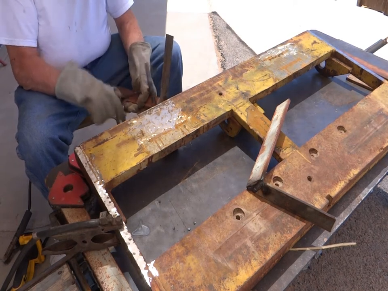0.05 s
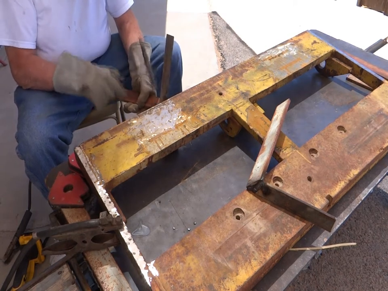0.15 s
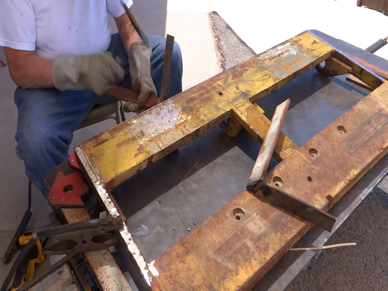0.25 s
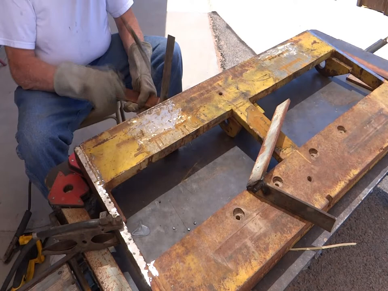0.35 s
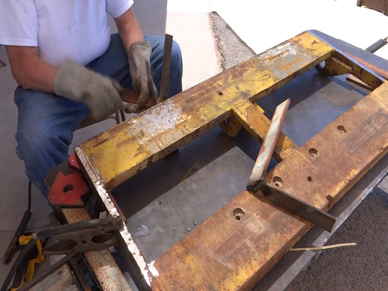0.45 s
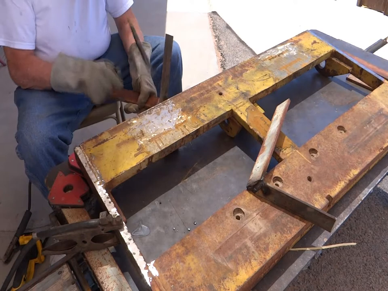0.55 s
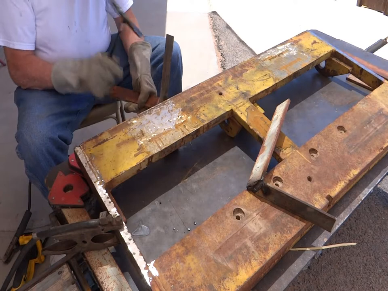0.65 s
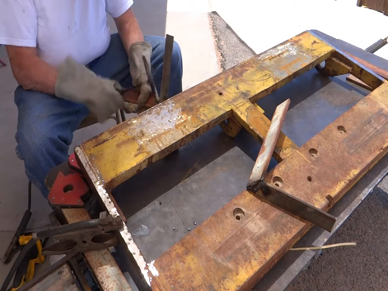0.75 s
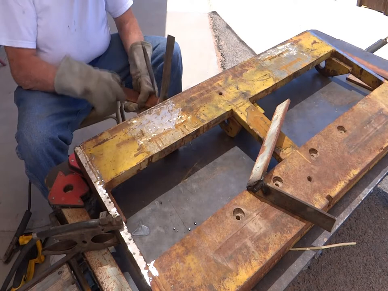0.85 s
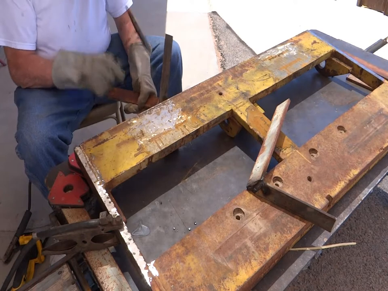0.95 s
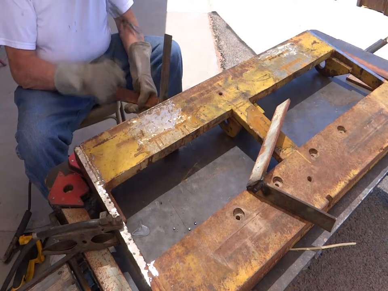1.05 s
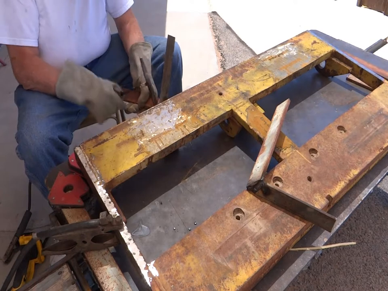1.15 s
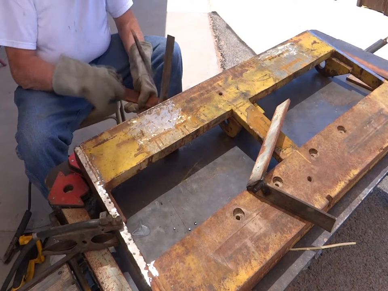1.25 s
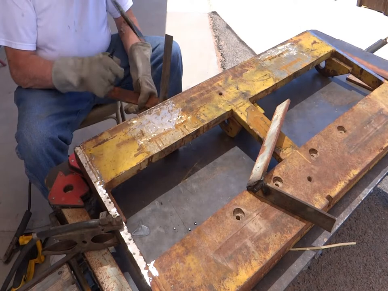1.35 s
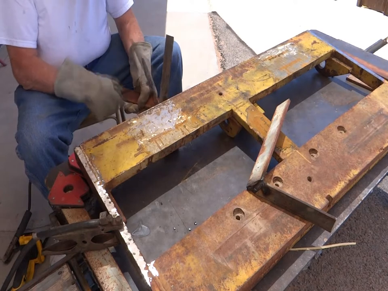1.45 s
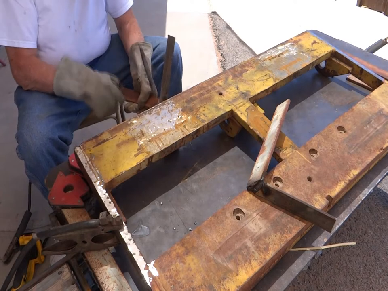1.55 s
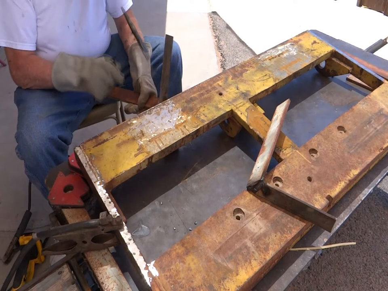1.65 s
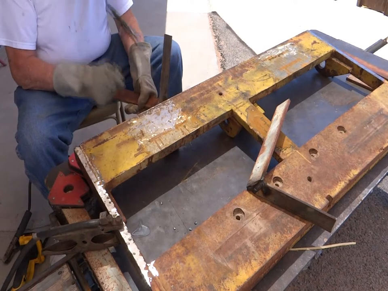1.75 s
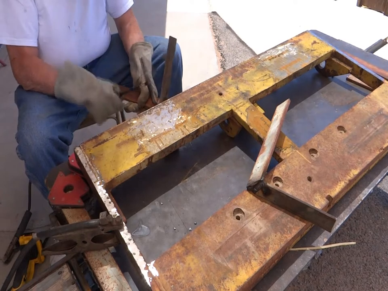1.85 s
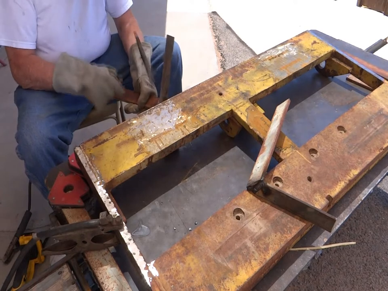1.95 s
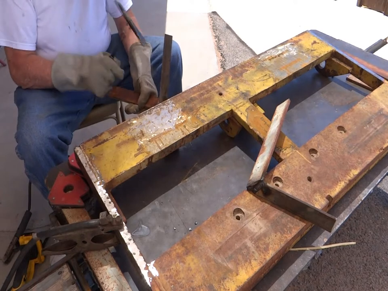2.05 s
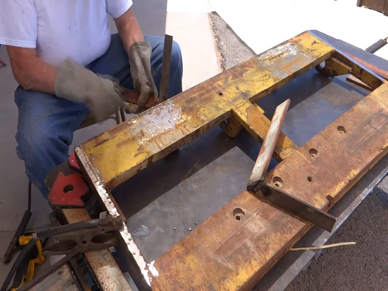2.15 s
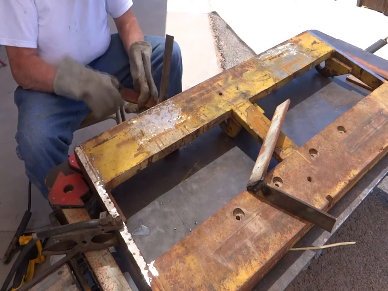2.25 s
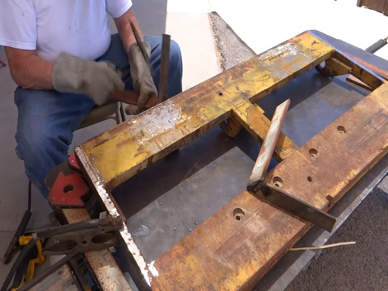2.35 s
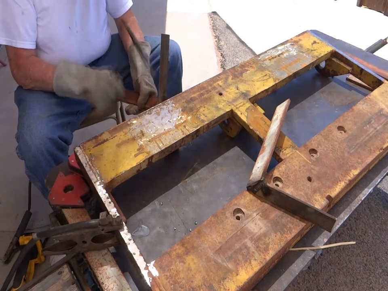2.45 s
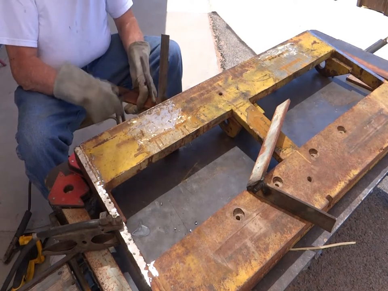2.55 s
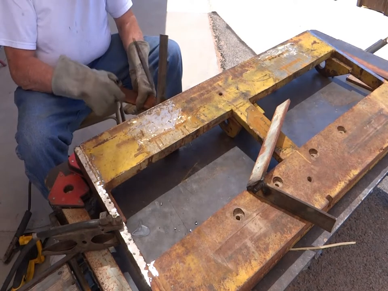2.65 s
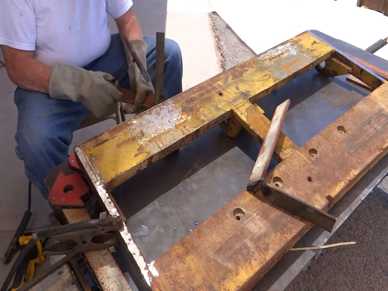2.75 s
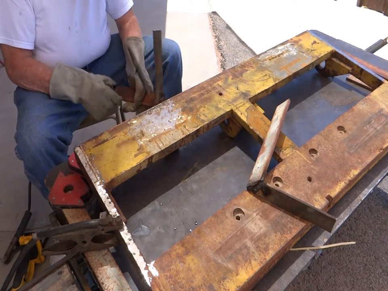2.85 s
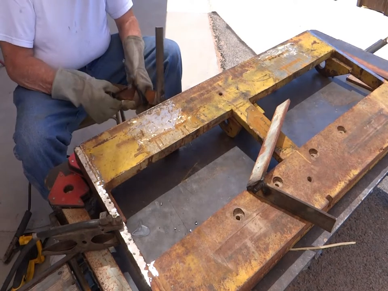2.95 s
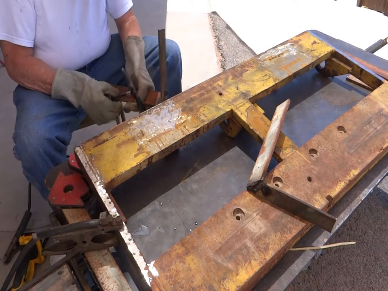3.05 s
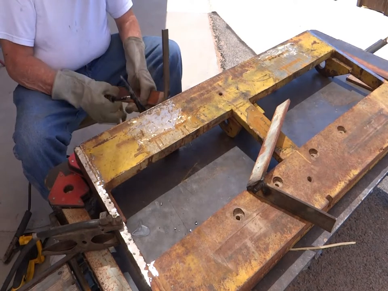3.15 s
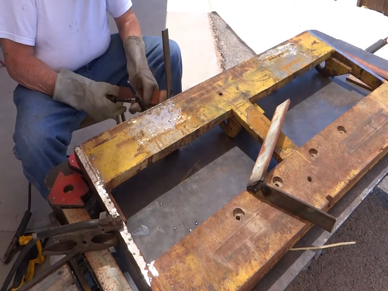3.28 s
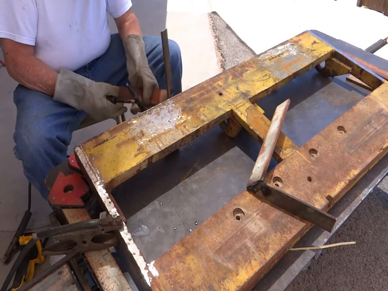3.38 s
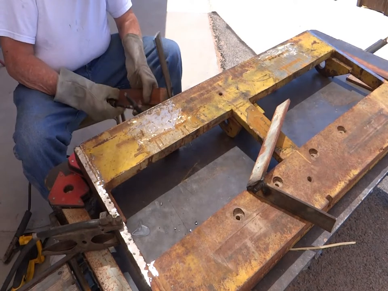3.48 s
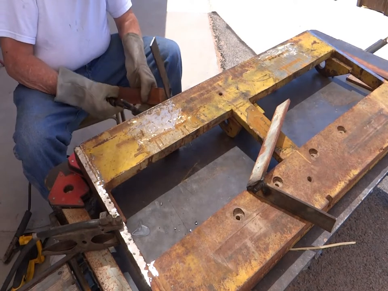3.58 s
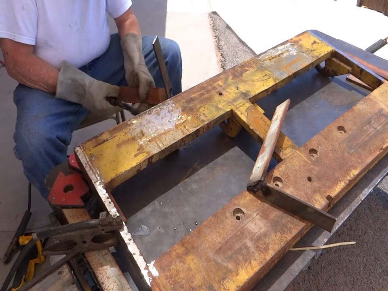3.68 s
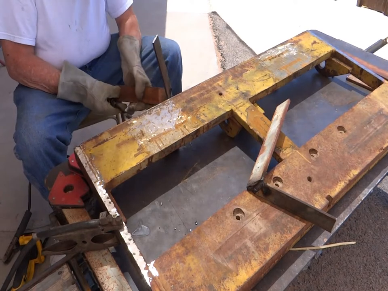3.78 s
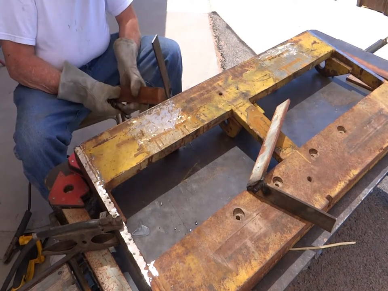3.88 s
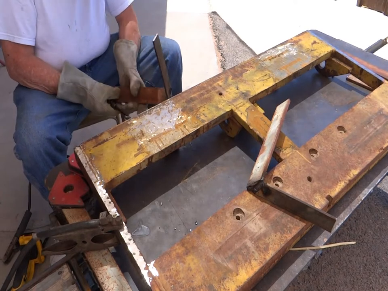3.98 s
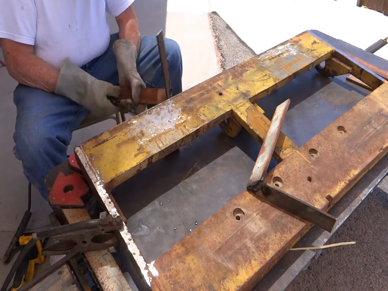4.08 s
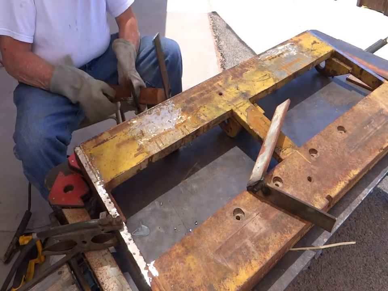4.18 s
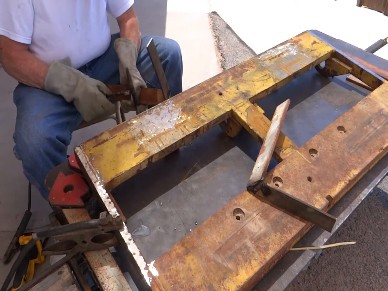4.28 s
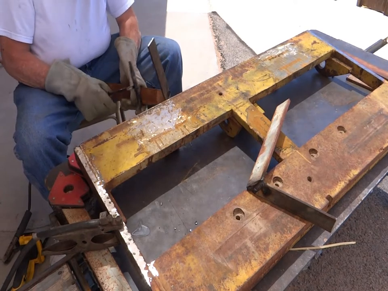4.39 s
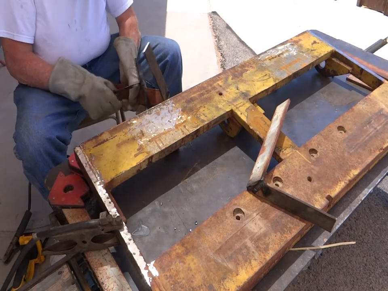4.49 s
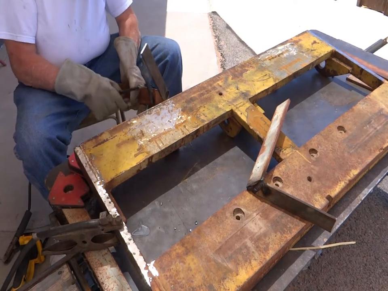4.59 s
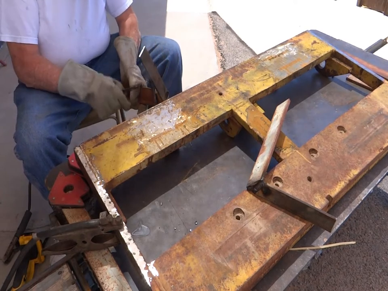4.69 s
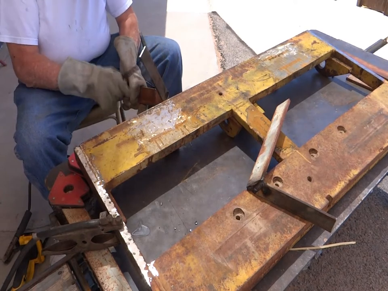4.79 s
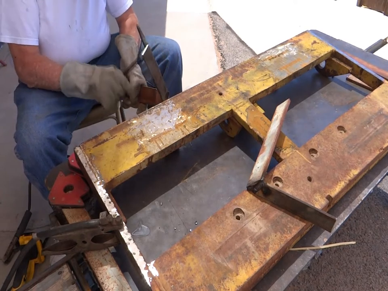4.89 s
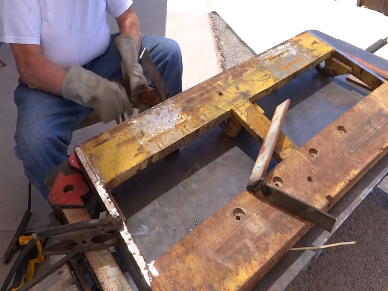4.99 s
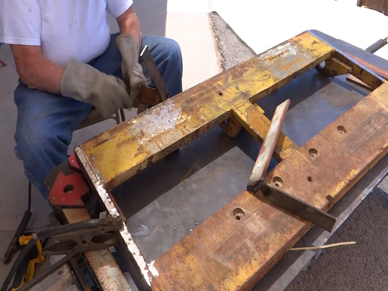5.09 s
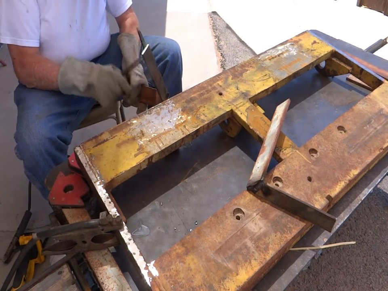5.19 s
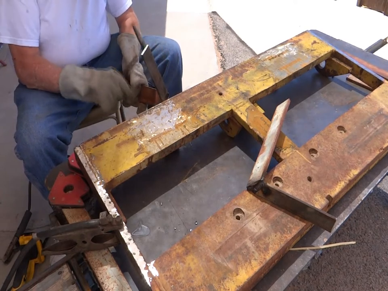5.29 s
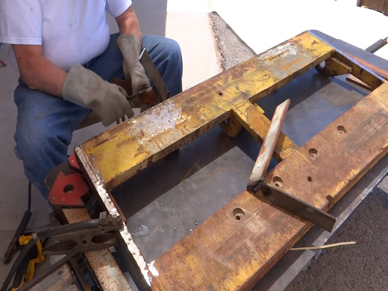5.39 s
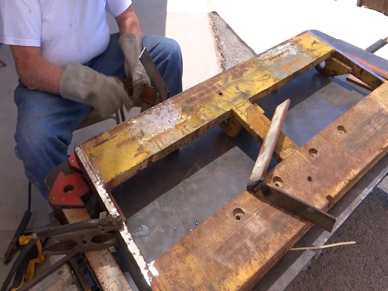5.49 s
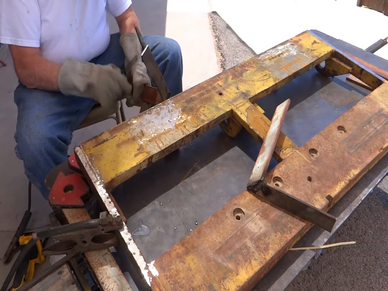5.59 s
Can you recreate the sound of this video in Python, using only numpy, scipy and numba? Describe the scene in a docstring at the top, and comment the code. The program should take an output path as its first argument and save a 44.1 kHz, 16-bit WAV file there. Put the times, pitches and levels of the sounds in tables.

```python
"""Chipping hammer on a welding cart.

A hammer strikes a steel bar outdoors: head, bar, bracket, clamp and cart frame ring, while the
sheet-steel tray and its loose tools clatter. Gloves knock and scuff the work between blows, over a
wavering hum and distant hiss. A limiter flattens each blow; a slow gain control ducks the yard."""
import sys
import numpy as np
from scipy import signal
from scipy.fft import rfft, irfft
from scipy.io import wavfile
from scipy.ndimage import uniform_filter1d
from numba import njit

SR = 44100
rng = np.random.default_rng(int(sys.argv[2]) if len(sys.argv) > 2 else 0)


def master_out(mix):
    """Clip the mix to full scale and print it as 16-bit PCM to the path in sys.argv[1]."""
    frames = np.transpose(np.atleast_2d(mix))
    ceiling = np.clip(frames, -1, 1)
    pcm = np.round(ceiling * 32767).astype(np.int16)
    wavfile.write(sys.argv[1], SR, pcm)


N = 248283

# Blows, taps, rebounds: start_s, clatter_db, clatter_s, bright_db, work_db, place (0 to 1), frame_db
BLOWS = [(-.17, -10, .3, 2.1, -36, .01, -67), (.188, -6, 0.36, .1, -31, .45, -51),
         (0.555, -4, .27, 5, -29, .02, -40), (0.919, 0, 0.24, 4, -24, .08, -31.5),
         (1.29, -5.5, .31, 4.5, -17, 0.43, -32.5), (1.638, -8.5, 0.31, 11.5, -13, 0.023, -34.5),
         (1.980, -7, 0.3, 7.5, -12, 0.26, -35.5), (2.336, -6, 0.29, 7.5, -11.5, 0.51, -32.5),
         (2.670, -4.5, 0.23, 8, -17.5, 0.43, -25), (3.093, -27.5, .04, 4, -31, 0.19, -35.5),
         (5.110, -25.5, 0.053, 14, -23, .5, -49), (5.138, -22.5, 0.099, 5, -20, .45, -43),
         (5.175, -3.5, .22, 2, -36, 0.4, -35), (5.296, -38, 0.042, 1.1, -24, 0.91, -42),
         (5.52, -11.5, 0.089, 9.5, -12, 0.7, -28.5), (5.55, -.5, 0.21, 2, -39, 0.24, -42)]
# Modes of each steel part: pitch_hz, level_db, t60_s
HAMMER_MODES = [(1138, -3, .2), (1933, -18, .3), (2324, 0, .27), (3418, -9, .29), (5604, -14, .12),
                (7833, -24, .15)]
BAR_MODES = [(2106, -9, .33), (3575, -10, .2), (3617, 0, .31), (6267, -5, .27)]
BRACKET_MODES = [(3834, 0, .29), (9102, -12, .18), (10440, -24, .25)]
CLAMP_MODES = [(4464, 0, .36), (7209, -9, .36)]
FRAME_MODES = [(755, 0, .75), (884, -1, .3), (1270, -4, .42)]
TOOL_MODES = [(2880, -5, .05), (4100, -6, .04), (4945, 0, .07), (5478, -2, .07), (5975, -2, .07),
              (6640, -8, .06), (7600, -8, .06), (8530, -10, .06), (9850, -11, .09)]
# Landings of a hopping tool: start_s, level_db
LANDINGS = [(.318, -26), (1.011, -16), (1.372, -14.5), (1.400, -18), (1.761, -25), (2.066, -23),
            (2.118, -28), (2.135, -25), (2.160, -31.5), (2.418, -13.5), (2.455, -24), (2.486, -29),
            (2.510, -23), (2.762, -27), (2.804, -33), (5.214, -11.5), (5.250, -22)]
# Glove contacts: start_s, level_db, bright_db
GLOVE_KNOCKS = [(3.364, -27.5, -1), (3.463, -29, 0.5), (3.628, -32, 4.5), (4.535, -33.5, -8)]
GLOVE_SCUFFS = [(3.555, -34.5, 1.1), (4.22, -27, 1.2), (4.372, -24.5, 0.73), (5.3, -21.5, 0.12)]
# Spectral shapes of tray, glove rub and yard hiss: freq_hz, density_db
TRAY_SPECTRUM = [(24, -53), (40, -58), (140, -1.5), (455, -8.5), (549, -1.5), (902, -1.5), (968, -7.5),
                 (2160, -7.5), (5820, -14.5), (6710, -20), (8690, -18.5), (10300, -22.5), (11300, -26),
                 (14700, -57), (22000, -120)]
GLOVE_SPECTRUM = [(60, -36), (150, 5), (400, 3.5), (1000, -5.5), (3000, -14.5), (6500, -21), (8000, -30),
                  (11500, -18)]
YARD_SPECTRUM = [(15, -58), (25, -42), (77, -13), (102, -12.5), (158, -2), (193, -8), (427, -13),
                 (694, -16.5), (993, -17.5), (1460, -21.5), (1660, -25), (4970, -34), (6260, -38.5),
                 (9920, -32), (11300, -35.5), (14700, -67), (22000, -120)]
# Hum tones: pitch_hz, width_hz, level_db
HUM_TONES = [(121.7, 14, -50.5), (154.9, 5.7, -48), (937, 20, -55.5), (1009, 13, -53.5)]
# Phase between the microphone ports: freq_hz, left_lead_rad
PORT_PHASE = [(0, 0), (430, 0.38), (860, 0.89), (4310, -0.19), (7240, 0.48), (10300, -1.64), (10600, -4.5),
              (11000, -1.5)]
# Balance between the ports: freq_hz, left_minus_right_db
PORT_BALANCE = [(60, -.3), (300, -.2), (1000, -.8), (4000, -.8), (9000, -1.2)]

BAR_PLACE, BRACKET_PLACE, CLAMP_PLACE = 0, .4, 1  # along the work
FALL_DB, HAMMER_FALL_DB = 18.5, 8.5  # ring lost over that length
TRAY_T60_1KHZ_S, TRAY_DAMPING_POWER = 0.061, 0.38
SETTLING_POWER = 1.51  # above 1: bouncing parts hold on, then stop quickly
TAIL_S = .7  # span of one hit
RATTLE_DB, SKID_DB, YARD_DB = -11.5, -4.5, -41.5
DUCK_KNEE_DB, LIMIT_KNEE_DB, CUTOFF_HZ = -29, -12, 10800
BIN_HZ = np.linspace(0, SR / 2, N // 2 + 1)
SIDE_SIGN = np.array([[1], [-1]])


def hammer_blows():
    """Per blow: clatter settings, then five ring levels. Bar, bracket and clamp ring most if hit close."""
    start_s, clatter_db, clatter_s, bright_db, work_db, place, frame_db = np.transpose(BLOWS)
    hammer_db = -17 + 0.2 * clatter_db - HAMMER_FALL_DB * place
    bar_db = work_db + 4 - FALL_DB * abs(place - BAR_PLACE)
    bracket_db = work_db - FALL_DB * abs(place - BRACKET_PLACE)
    clamp_db = work_db + 0.3 - FALL_DB * abs(place - CLAMP_PLACE)
    return np.transpose([start_s, clatter_db, clatter_s, bright_db,
                         hammer_db, bar_db, bracket_db, clamp_db, frame_db])


def steel_ring():
    """Each blow kicks every mode of the solid parts; lighter blows wake the high modes less."""
    out = np.zeros(N)
    for part, modes in enumerate((HAMMER_MODES, BAR_MODES, BRACKET_MODES, CLAMP_MODES, FRAME_MODES)):
        hz, mode_db, t60_s = np.transpose(modes)[:, :, None]
        for start_s, clatter_db, clatter_s, _, *ring_db in hammer_blows():
            span = tail(start_s)
            t = np.arange(N)[span] / SR - start_s
            strength, detune, offset = rng.standard_normal((3, len(modes), 1))
            # a long clatter feeds the ring at first, damps it later
            decay = 1000. ** -(t.clip(0) / t60_s) ** (1 + 1.4 * clatter_s)
            dull_db = 0.1 * min(clatter_db, 0) * np.log2(hz / 4600).clip(0)
            gain = undb(ring_db[part] + mode_db + dull_db + 1.2 * strength)
            phase = 2 * np.pi * hz * (1 + .0004 * detune) * t + 3 * offset
            edges = np.clip(t / .002, 0, 1) * np.clip((TAIL_S - t) * 10, 0, 1)
            out[span] += (gain * decay * np.sin(phase)).sum(axis=0) * edges
    return out


def tray_clatter(mode_count=260):
    """Each blow sets tools chattering on the tray, whose crowded modes blur into a crash."""
    chatter = (grit(5000) + .3 * grit(120)) * undb(1.3 * wander(90))
    hz = 90 + 11200 * ((np.arange(mode_count) + rng.random(mode_count)) / mode_count) ** 1.4
    t60_s = TRAY_T60_1KHZ_S * (hz / 1000) ** -TRAY_DAMPING_POWER
    weight = undb(lookup(TRAY_SPECTRUM, hz)) * np.sqrt(np.gradient(hz).clip(1) / t60_s)
    weight /= np.sqrt(np.sum(weight ** 2 * t60_s * SR / (4 * np.log(1000))))  # unit power gain
    out = np.zeros((2, N))
    for start_s, clatter_db, clatter_s, bright_db, *_ in hammer_blows():
        span = tail(start_s)
        # hard knocks build later and stop first; a faint rattle lasts longest
        soft = chatter[span] * burst(start_s, 0.0014, 0.81 * clatter_s, SETTLING_POWER, span)
        hard = chatter[span] * burst(start_s, 0.0064, 0.73 * clatter_s, 2.1, span)
        rattle = chatter[span] * burst(start_s, 0.0018, 2.02 * clatter_s, span=span)
        soft = shelf(soft + undb(RATTLE_DB) * rattle, -8, knee_hz=3600)
        hard = shelf(hard, -2, knee_hz=4860)
        hard -= shelf(hard, -60, knee_hz=2450)  # high-pass
        drive = undb(clatter_db) * (soft + undb(bright_db) * hard)
        # tools land in new places, so each mode gets a new share
        share_db, phase, scatter = rng.standard_normal((3, mode_count))
        gain = weight * undb(share_db) * np.exp(.3j * phase) * (-1) ** np.arange(mode_count)
        # nearby surfaces scatter the phase between ports, most in the treble
        turn = np.exp(1j * (0.04 + 0.35 * hz / 10000) * scatter)
        out[:, span] += resonate(drive, poles(hz, t60_s), gain * turn, gain / turn)
    return out


def loose_tools():
    """Small tools hop after a blow; each landing pings them and skids briefly on the tray."""
    hz, mode_db, t60_s = np.transpose(TOOL_MODES)
    shaking = sum(undb(clatter_db) * burst(start_s, .02, .8 * clatter_s, SETTLING_POWER)
                  for start_s, clatter_db, clatter_s, *_ in hammer_blows())
    hops = undb(-49) * grit(90) * shaking
    scratch = undb(-30) * shelf(grit(4000), 30, knee_hz=2500)
    skid = np.zeros(N)
    for start_s, level_db in LANDINGS:
        span = tail(start_s)
        hops[int(start_s * SR)] += undb(level_db)
        skid[span] += undb(level_db + SKID_DB) * burst(start_s, rise_s=.001, t60_s=0.16, span=span)
    turn = np.exp(.3j * rng.standard_normal(len(hz)))
    pings = resonate(hops, poles(hz, t60_s), undb(mode_db) * turn, undb(mode_db) / turn)
    return pings + skid * scratch


def gloves():
    """Dull knocks and gritty scuffs of leather and slag on the work."""
    mid, side = (colour(grit(2500), GLOVE_SPECTRUM) for _ in range(2))
    rub = mid + 0.24 * side * SIDE_SIGN
    knocks = sum(shelf(undb(level_db) * burst(start_s, rise_s=0.0024, t60_s=0.22) * rub, bright_db)
                 for start_s, level_db, bright_db in GLOVE_KNOCKS)
    scuffs = sum(shelf(undb(level_db) * burst(start_s, rise_s=0.024, t60_s=0.33) * rub, bright_db)
                 for start_s, level_db, bright_db in GLOVE_SCUFFS)
    return knocks + scuffs


def yard_hiss():
    """Distant hiss in flickering octave bands, near mono in the bass."""
    spectra = rfft([colour(rng.standard_normal(N), YARD_SPECTRUM) for _ in range(2)])
    swell = wander(1)
    out = np.zeros((2, N))
    for hz in 30 * 2. ** np.arange(10):
        band = np.cos(np.pi / 2 * np.log2((BIN_HZ + 1) / hz).clip(-1, 1)) ** 2
        mid, side = irfft(spectra * band, N)
        width = np.clip(0.18 * (hz / 300) ** 0.38, 0, 1)
        flicker_db = (0.09 * swell + 2 * wander(9)) * min(1, (500 / hz) ** 0.35)
        out += undb(flicker_db) * (mid + width * side * SIDE_SIGN)
    return out * undb(YARD_DB)


def yard_hum():
    """Narrow noise bands, heard as wavering tones."""
    out = np.zeros(N)
    for pitch_hz, width_hz, level_db in HUM_TONES:
        peak = 1 / (1 + (2 * (BIN_HZ - pitch_hz) / width_hz) ** 2)
        tone = irfft(rfft(rng.standard_normal(N)) * peak, N)
        out += undb(level_db) * tone / tone.std()
    return out


def undb(db):
    return 10 ** (np.asarray(db) / 20)


def lookup(table, hz):
    """Interpolate on a log frequency axis."""
    freq_hz, values = np.transpose(table)
    return np.interp(np.log(np.maximum(hz, 1)), np.log(freq_hz), values)


def colour(x, spectrum):
    """Shape white noise, keeping its rms."""
    gain = undb(lookup(spectrum, BIN_HZ))
    return irfft(rfft(x) * gain / np.sqrt(np.mean(gain ** 2)), N)


def wander(rate_hz):
    """Random steps, smoothed twice."""
    hold = int(SR / rate_hz)
    steps = np.repeat(rng.standard_normal(N // hold + 1), hold)
    return 0.9 * uniform_filter1d(uniform_filter1d(steps, hold), hold)[:N]


def grit(rate_hz, spread_db=2.5):
    """Tiny impacts of uneven size; rms 1."""
    chance, sign, size = rng.random((3, N))
    impacts = (chance < rate_hz / SR) * np.sign(sign - .5) * undb(-spread_db * np.log(1 - size))
    return impacts / impacts.std()


def tail(start_s):
    """Samples spanned by a hit."""
    return slice(int(max(start_s, 0) * SR), min(int((start_s + TAIL_S) * SR), N))


def burst(start_s, rise_s, t60_s, settling=0.97, span=slice(None)):
    """Rise-and-decay envelope; settling 1 is a plain exponential decay."""
    t = np.maximum(np.arange(N)[span] / SR - start_s, 0)
    return (1 - np.exp(-t / rise_s)) * 1000. ** -(t / t60_s) ** settling


def shelf(x, gain_db, knee_hz=1800):
    """Lift or drop the treble."""
    low = signal.lfilter(*signal.butter(1, knee_hz, fs=SR), x)
    return low + undb(gain_db) * (x - low)


def poles(hz, t60_s):
    """Per-sample rotation and decay of each mode."""
    return np.exp((2j * np.pi * hz - np.log(1000) / t60_s) / SR)


@njit
def resonate(drive, pole, left_gain, right_gain):
    """Mode bank; each mode reaches the two ports with its own gain and phase."""
    out = np.zeros((2, len(drive)))
    state = np.zeros(len(pole), np.complex128)
    for i in range(len(drive)):
        for k in range(len(pole)):
            state[k] = state[k] * pole[k] + (drive[i] + 1e-18)
            out[0, i] += (state[k] * left_gain[k]).imag
            out[1, i] += (state[k] * right_gain[k]).imag
    return out


@njit
def follow(x, attack_s, release_s):
    """Level follower."""
    level, out = 0., np.empty(len(x))
    for i in range(len(x)):
        level += (x[i] - level) / (SR * (attack_s if x[i] > level else release_s))
        out[i] = level
    return out


def scene():
    """All sources reach two close microphone ports."""
    mix = tray_clatter() + loose_tools() + steel_ring() + gloves() + yard_hiss() + yard_hum()
    left_gain = undb(lookup(PORT_BALANCE, BIN_HZ) / 2) * np.exp(.5j * lookup(PORT_PHASE, BIN_HZ))
    return irfft(rfft(mix) * np.array([left_gain, 1 / left_gain]), N)


def record(dry):
    """Slow gain control ducks after loud blows, a fast limiter holds their tops, the treble is cut."""
    slow_level = follow(np.abs(dry).max(axis=0), attack_s=.06, release_s=.6)
    ducked = dry * (1 + slow_level / undb(DUCK_KNEE_DB)) ** -.2
    fast_level = follow(np.abs(ducked).max(axis=0), attack_s=.0004, release_s=.014)
    limited = ducked * (1 + (fast_level / undb(LIMIT_KNEE_DB)) ** 2) ** -.42
    return signal.sosfilt(signal.ellip(8, .2, 70, CUTOFF_HZ, fs=SR, output="sos"), limited)


dry = scene()
out = record(dry)
master_out(out)
```